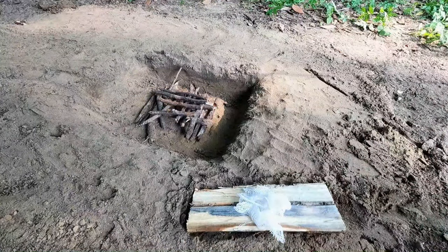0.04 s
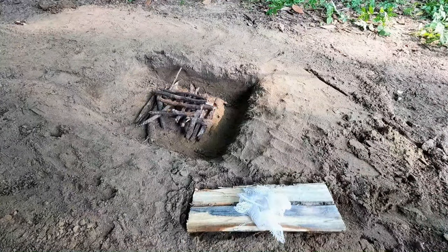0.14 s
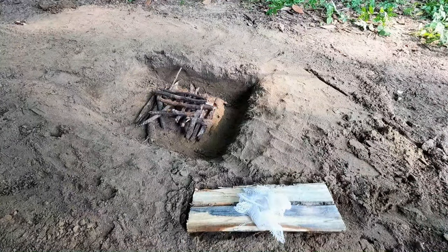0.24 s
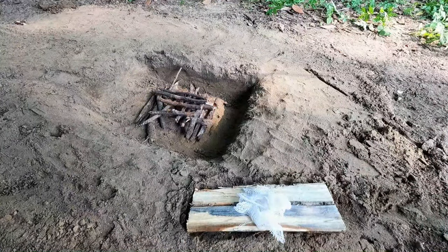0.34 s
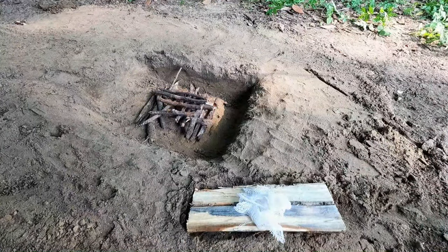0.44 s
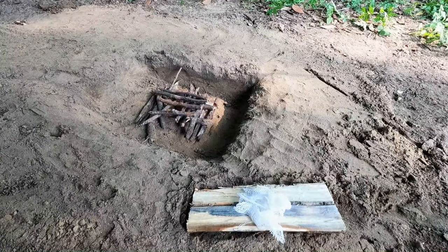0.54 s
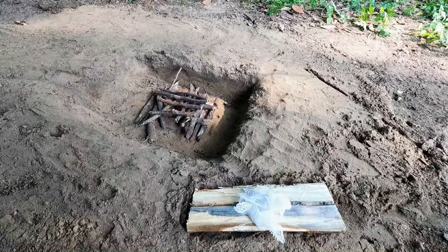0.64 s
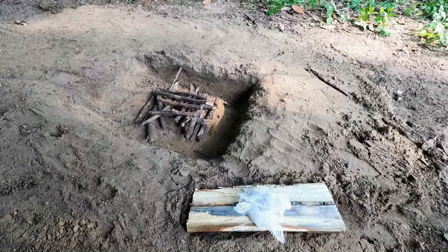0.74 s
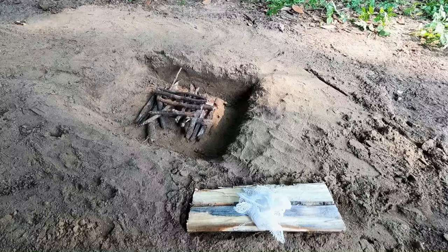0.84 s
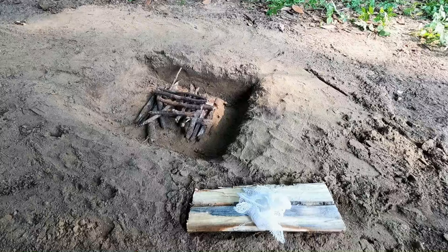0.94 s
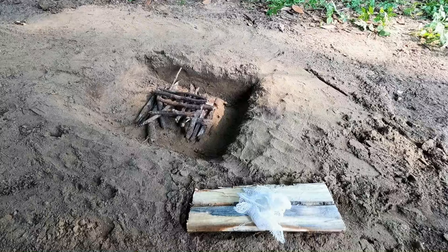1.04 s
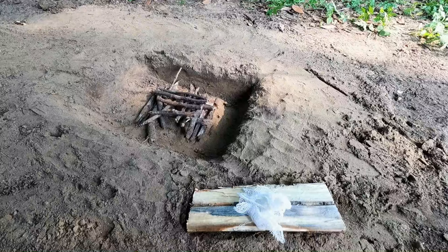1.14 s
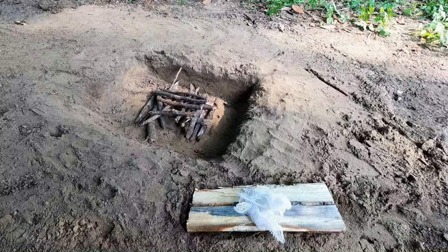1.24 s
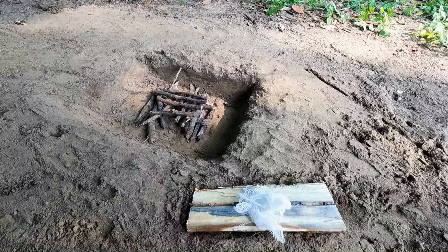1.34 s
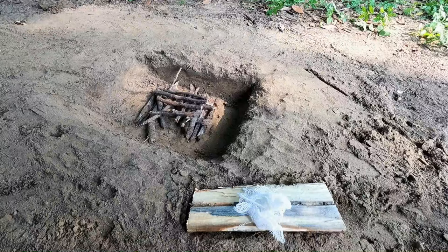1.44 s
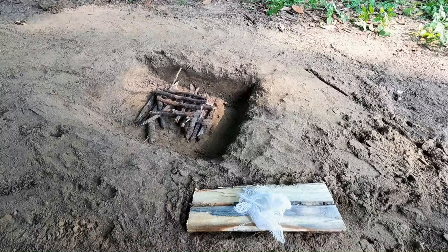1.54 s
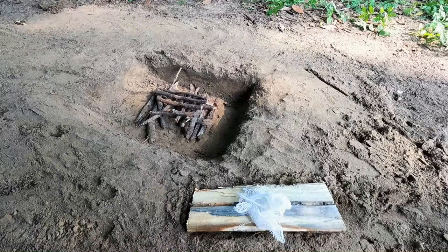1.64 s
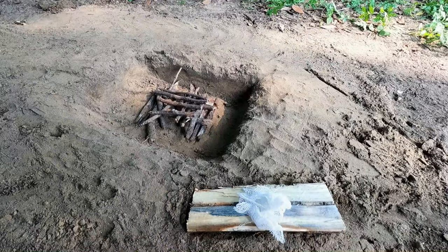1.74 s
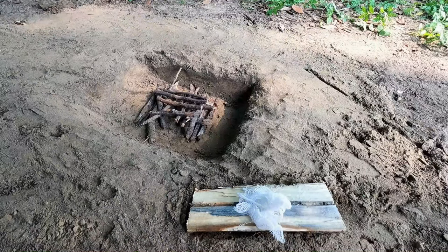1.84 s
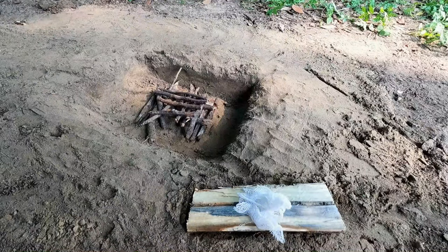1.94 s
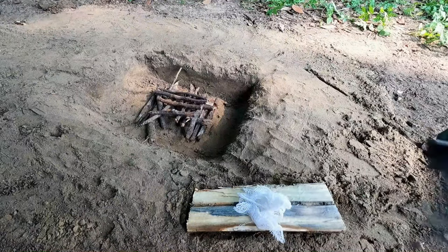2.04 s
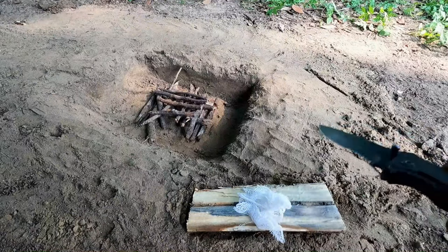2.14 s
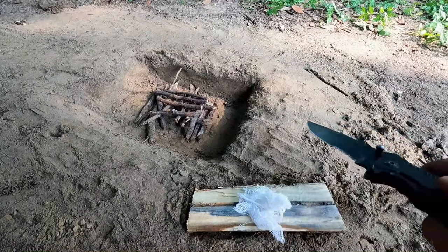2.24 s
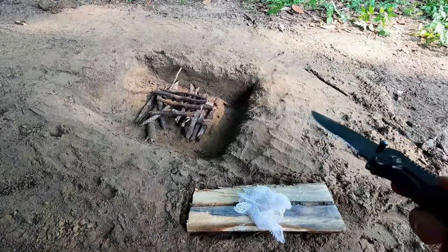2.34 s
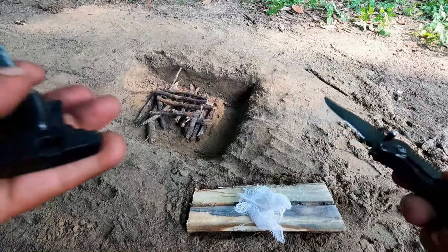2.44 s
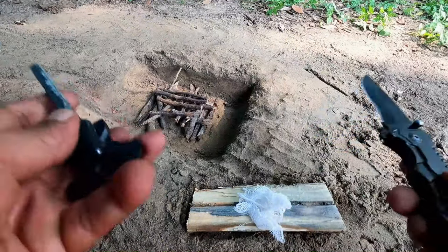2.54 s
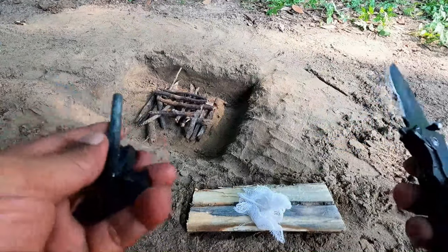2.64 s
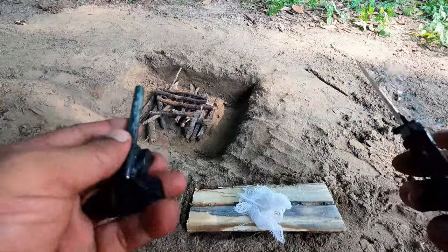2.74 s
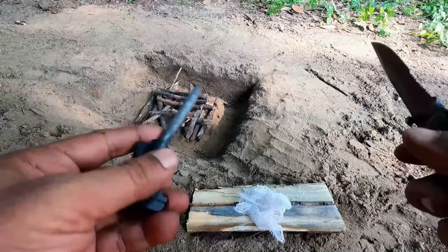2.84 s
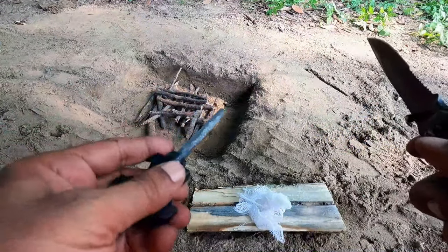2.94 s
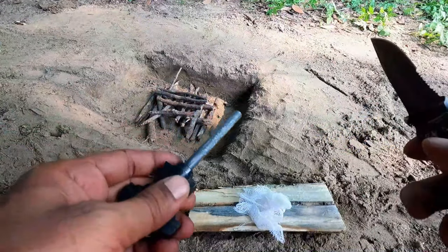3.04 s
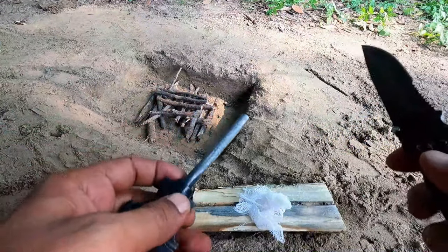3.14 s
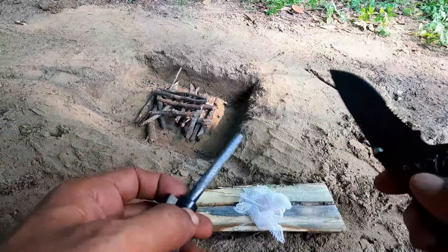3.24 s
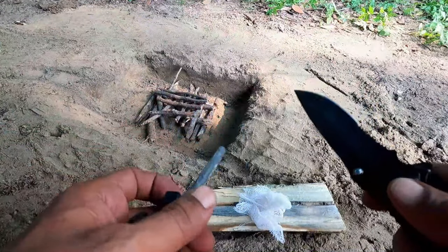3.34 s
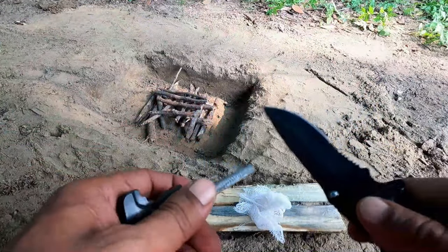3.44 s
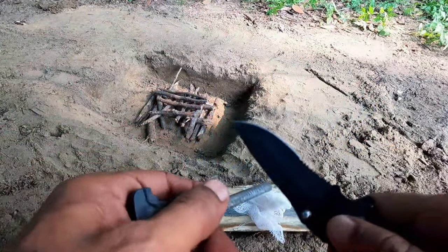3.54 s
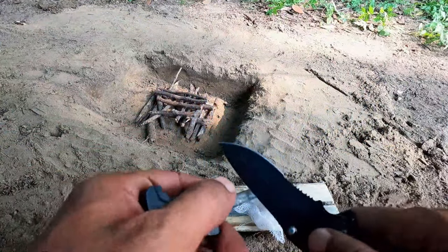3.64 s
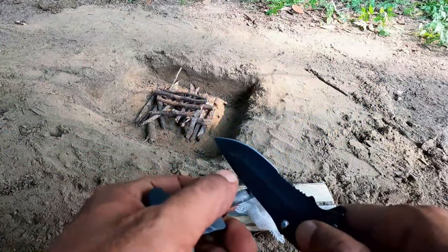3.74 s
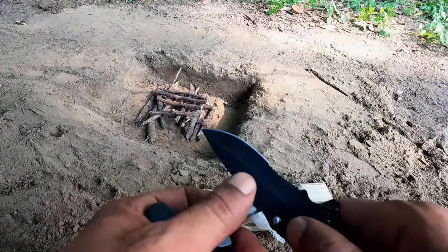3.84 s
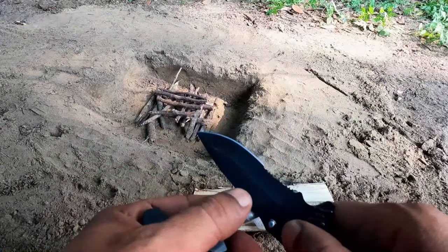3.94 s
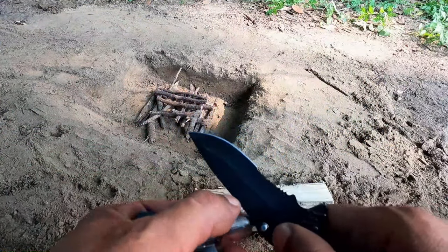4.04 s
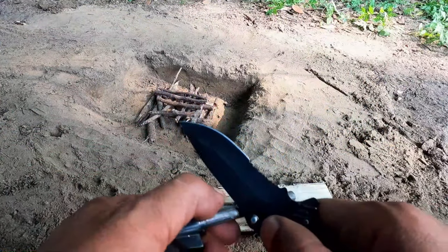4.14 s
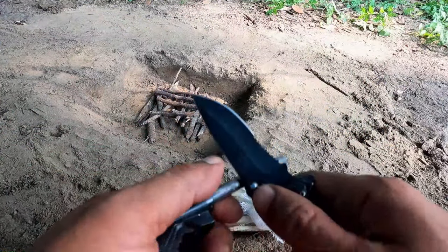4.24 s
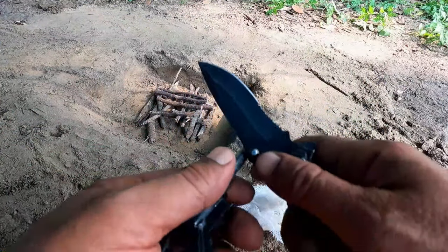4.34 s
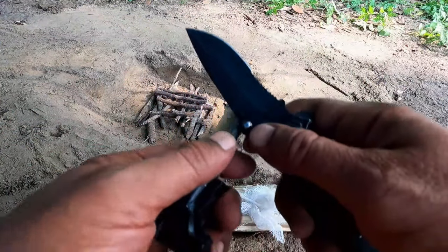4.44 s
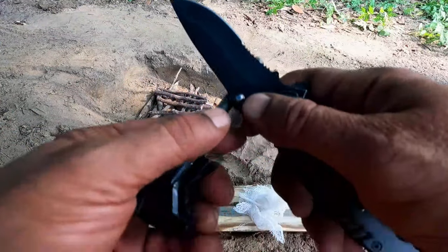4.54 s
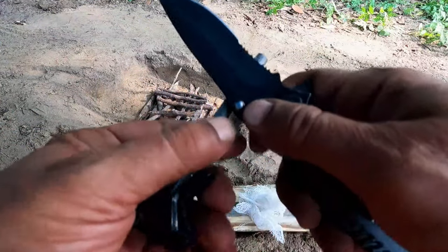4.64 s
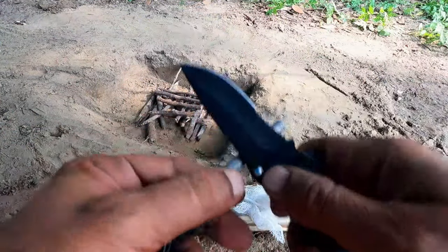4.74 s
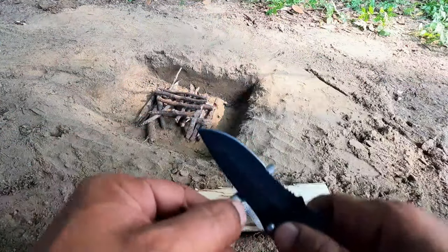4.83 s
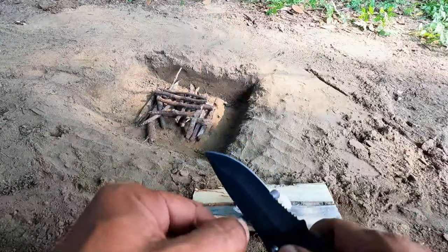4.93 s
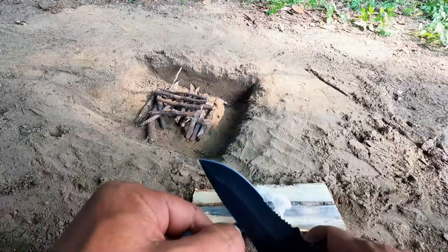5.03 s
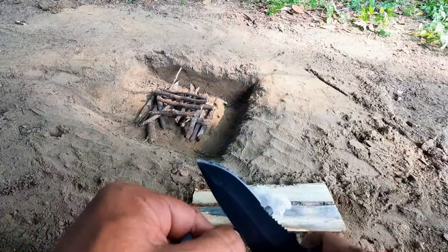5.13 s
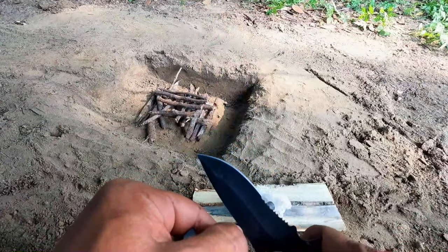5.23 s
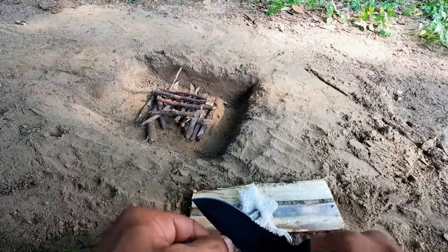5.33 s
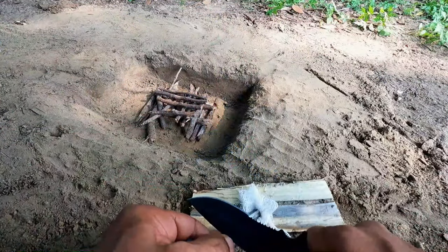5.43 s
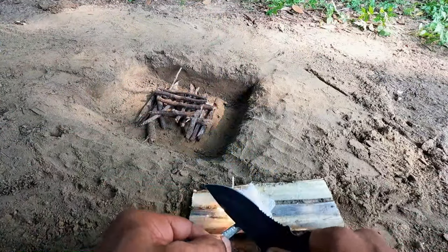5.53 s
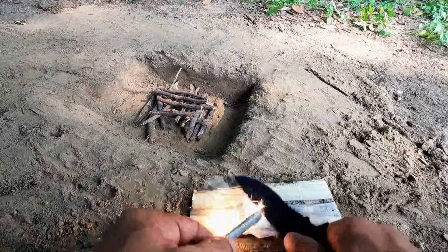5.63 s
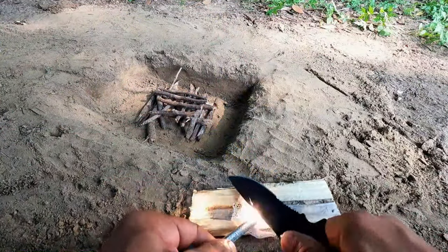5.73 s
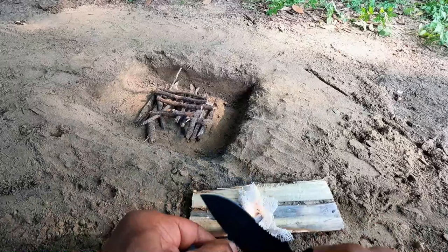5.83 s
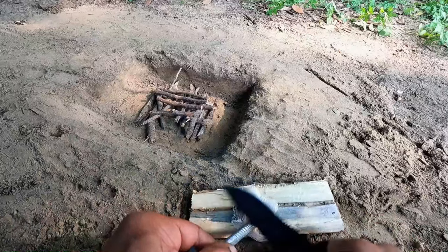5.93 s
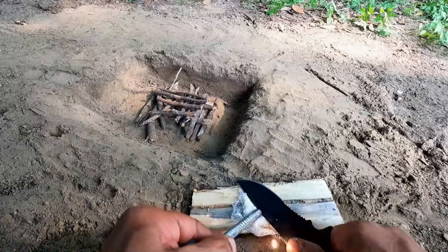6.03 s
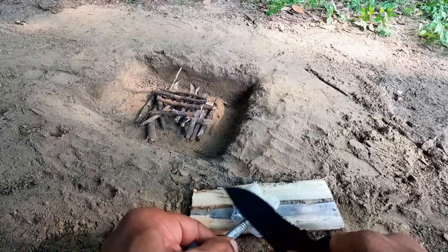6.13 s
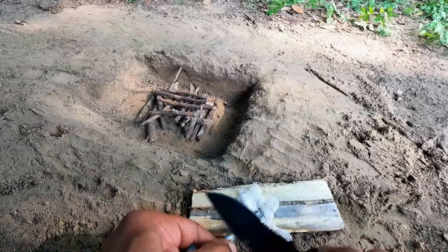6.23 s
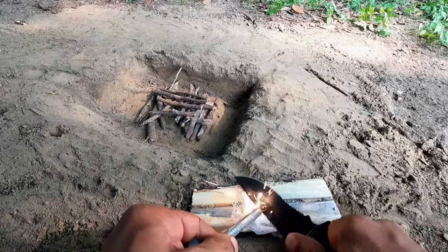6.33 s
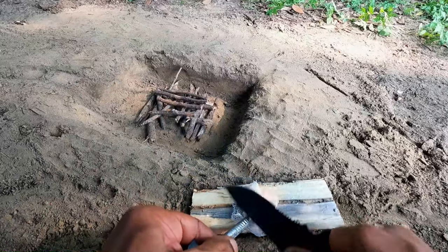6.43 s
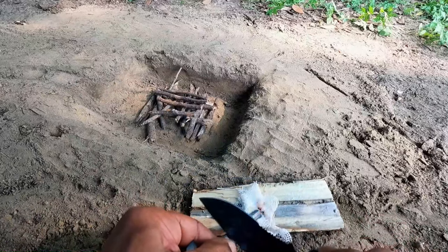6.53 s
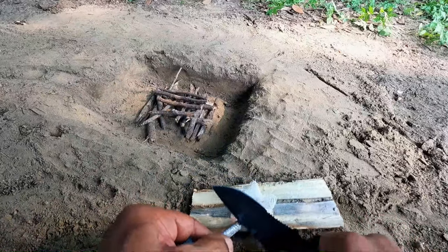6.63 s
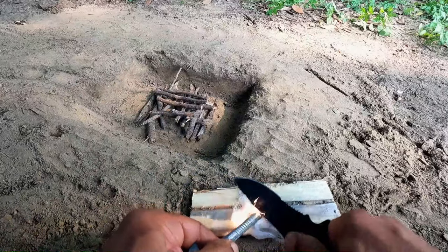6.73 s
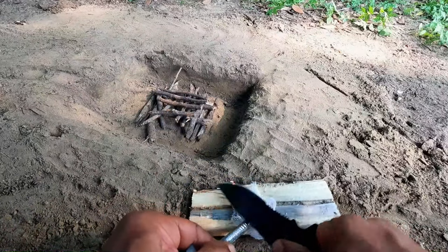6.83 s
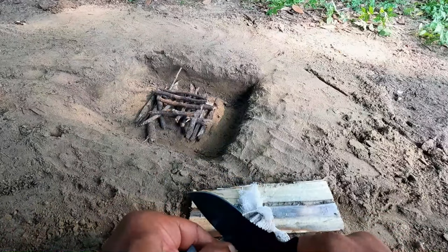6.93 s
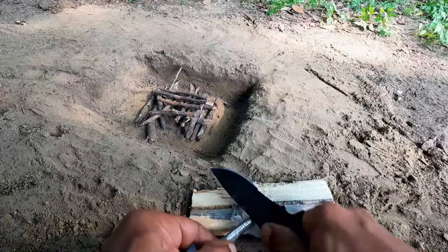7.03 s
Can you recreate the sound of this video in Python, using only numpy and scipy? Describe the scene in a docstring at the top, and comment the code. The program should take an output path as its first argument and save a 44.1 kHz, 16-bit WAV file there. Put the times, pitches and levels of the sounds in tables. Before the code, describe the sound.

Close-up outdoors, a low wavering engine throb and rumble sit under faint leaves, insects and brief hoarse bird calls. A folding knife snaps open with a sharp double metallic click. The blade knocks and slides lightly on a fire-starter rod, then strikes it in a fast series of bright, gritty rasps, with crackling sparks and soft popping flares.

```python
"""Outdoors, a folding knife snaps open, is set against a ferro rod, slides along it, then strikes down it in a fast run.
Each hard stroke rasps as random grains of torn metal ring the steel, throws sparks made of tiny broad snaps,
and ends in a soft pop as the shavings flare: a tone sinking within milliseconds, mixed with noise.
Behind it a far engine throbs as a wavering low tone over a rumble of shaped noise; leaves and insects are
patchy bright noise, birds hoarse gliding tones. A limiter ducks the loud moments."""
import sys
import numpy as np
from scipy import signal
from scipy.fft import rfft, irfft
from scipy.io import wavfile
from scipy.ndimage import uniform_filter1d, minimum_filter1d

SR = 44100
rng = np.random.default_rng(int(sys.argv[2]) if len(sys.argv) > 2 else 0)


def master_out(mix):
    """Clip the mix to full scale and print it as 16-bit PCM to the path in sys.argv[1]."""
    frames = np.transpose(np.atleast_2d(mix))
    ceiling = np.clip(frames, -1, 1)
    pcm = np.round(ceiling * 32767).astype(np.int16)
    wavfile.write(sys.argv[1], SR, pcm)


N = 312228

# colour of burning metal: (frequency [Hz], level [dB])
BURNING_COLOUR = [(60, 6), (280, 5.5), (520, -9.5), (1000, 3), (1350, -9.5), (2300, -2.5), (3800, -4.5),
                  (5200, -12.5), (8000, -15.5), (12000, -26), (16000, -50)]

BINS = np.fft.rfftfreq(2048, 1 / SR)  # frequencies [Hz] on which the short responses are drawn


def amp(db):
    """Decibels to linear gain."""
    return 10 ** (np.asarray(db) / 20)


def unit(x):
    """Scale to an RMS of one."""
    return x / np.sqrt(np.mean(x ** 2) + 1e-20)


def read(points, hz):
    """A spectrum's value at hz, on a log-frequency axis."""
    f, value = np.transpose(points)
    return np.interp(np.log(hz + 1), np.log(f + 1), value)


def follow(points):
    """A time curve's value at every sample."""
    return np.interp(np.arange(N) / SR, *np.transpose(points))


def add(mix, s, sound):
    """Lay a sound into the mix from s seconds on."""
    part = mix[round(s * SR):][:len(sound)]
    part += sound[:len(part)]


def noise(colour):
    """Steady noise of a given colour, at unit RMS."""
    gain = amp(read(colour, np.fft.rfftfreq(N, 1 / SR)))
    return unit(irfft(rfft(rng.standard_normal(N)) * gain, N))


def drift(rate_hz, size):
    """Smooth random wandering, mostly slower than the rate."""
    smoothing = np.exp(-(np.fft.rfftfreq(N, 1 / SR) / rate_hz) ** 2)
    return unit(irfft(rfft(rng.standard_normal(N)) * smoothing, N))[:size]


def ring(gain_db):
    """The causal (minimum-phase) impulse response of a colour given on BINS."""
    log_gain = np.log(amp(np.r_[gain_db, gain_db[-2:0:-1]]))
    spectrum = np.exp(np.conj(signal.hilbert(log_gain)))
    return np.fft.ifft(spectrum).real[:len(BINS)]


def strikes():
    """One force drives rasp and growing sparks; at the release the edge snaps, shavings flare and embers fizz on."""
    # hard strokes down the rod: (bite [s], hardest push [s], release [s], rasp [dB], snap at the release [dB],
    # sparks [dB], flare [dB], embers at their start [dB], first rasp pitch [Hz], last rasp pitch [Hz])
    hard_strokes = [(5.639, 5.649, 5.663, -7, 1.5, -13.5, -13, -29, 3430, 2700),
                    (5.761, 5.764, 5.801, -11.5, -8, -4, -4.5, -38, 3050, 2800),
                    (6.084, 6.103, 6.126, -9, -10, -14.5, 1, -23, 4140, 2080),
                    (6.404, 6.433, 6.466, -11.5, -4, -13, -1.5, -14.5, 3830, 2150),
                    (6.713, 6.751, 6.749, -12, -6.5, -18, -12.5, -18, 3300, 2640),
                    (6.866, 6.876, 6.912, -10, 4.5, -11.5, -9, -33, 3300, 2800)]
    snap_hz = 2680
    ember_s, ember_fade_db = .032, -15.5
    out = np.zeros(N)
    for bite, push, release, rasp_db, snap_db, sparks_db, flare_db, embers_db, first_hz, last_hz in hard_strokes:
        s, force = pressure(bite, push, release)
        pitches_hz = np.geomspace(first_hz, last_hz, 4)
        add(out, s, amp(rasp_db) * scrape(s, force, pitches_hz, favour_db=12, octaves=.19))
        spark_heat = force * np.sqrt(travel(force))  # shavings catch as they are cut
        add(out, s, amp(sparks_db) * shower(spark_heat, tilt_db=0))
        add(out, release, amp(snap_db) * knock(release, snap_hz))
        add(out, release, amp(flare_db) * flare())
        middle_db = embers_db + ember_fade_db / 2
        s, heat = stroke(release, release + ember_s, middle_db, ember_fade_db, rise=.0038, fall=.034)
        add(out, s, shower(heat, tilt_db=3.5))  # embers sound brighter than sparks
    return out


def pressure(bite, push, release):
    """Start time and force of a strike: bite, bearing down to the hardest push near or before release, leaving the rod."""
    bite_s, let_go_s = .034, .02  # time to bite and to let go
    bite_db, ease_db_per_s = -7.5, -250  # force at the bite below the hardest push; slope from push to release
    times = [bite - bite_s, bite, push, release, release + let_go_s]
    t = np.arange(times[0], times[-1], 1 / SR)
    force_db = [-60, bite_db, 0, ease_db_per_s * (release - push), -60]
    return times[0], amp(np.interp(t, times, force_db))


def travel(force):
    """How far the edge has run along its stroke, 0 to 1, taking speed as proportional to force."""
    return np.cumsum(force) / np.sum(force)


def scrape(s, force, pitches_hz, favour_db, octaves, judder_db=1.5):
    """The edge tears grains off in juddering slips; the steel rings at each pitch in turn as the contact moves."""
    size = len(force)
    slips = chatter(size, slip_hz=220, jitter=.45, hold_s=.0014, bed=.33)
    judder = amp(judder_db * unit(uniform_filter1d(rng.standard_normal(size), size=SR // 140)))
    tearing = unit(grains(size, per_s=8000, spread_db=1.5) * slips * judder) * force
    place = travel(force) * (len(pitches_hz) - 1)
    bodies = [steel(s, hz, favour_db, octaves) for hz in pitches_hz]
    rasp = 0
    for k, body in enumerate(bodies):
        share = np.sqrt(np.maximum(1 - abs(place - k), 0))  # equal-power crossfade between pitches
        rasp = rasp + signal.fftconvolve(tearing * share, body / np.linalg.norm(body))
    return rasp


def chatter(size, slip_hz, jitter, hold_s, bed, bite_db=5.5):
    """The edge catches and slips unevenly; each slip is a burst of its own strength that fades over a steady bed."""
    gaps = np.exp(jitter * rng.standard_normal(size)) / slip_hz
    slips = np.cumsum(gaps) - gaps[0]
    t = np.arange(size) / SR
    last = np.searchsorted(slips, t, "right") - 1
    bite = amp(bite_db * rng.uniform(-1, 1, size))
    return bite[last] * (bed + np.exp(-(t - slips[last]) / hold_s))


def grains(size, per_s, spread_db):
    """Random tiny impulses of either sign, a few much larger than the rest."""
    chance, sign, weight = rng.random((3, size))
    strength = amp(-spread_db * np.log(np.maximum(weight, np.exp(-3))))
    return (chance < per_s / SR) * np.sign(sign - .5) * strength


def steel(s, pitch_hz, favour_db, octaves, ripple_db=4):
    """Knife and rod ring together; the contact favours one region and reshuffles the finer resonances."""
    # broad colour of knife and rod in the hands: (frequency [Hz], level [dB])
    broad_colour = [(500, -16), (1000, -16.5), (1800, -13), (2850, -1.5), (5000, -9), (6500, -11.5),
                    (10000, -16.5), (13000, -25), (16000, -60)]
    # their resonances: (centre [Hz], width [Hz], boost [dB])
    resonances = [(726, 210, 5), (2280, 480, 1.7), (4230, 590, 5.3), (5670, 450, 8.5), (7520, 1400, 6.3)]
    # the knife's handle: (centre [Hz], width [Hz], share of the looseness boost [ratio])
    handle_modes = [(1485, 705, 1), (2290, 210, 0.3455), (3257, 180, 0.3)]
    # the handle rings more the more loosely it is held: (time [s], level [dB])
    looseness = [(2.3, 5), (3.8, 13.5), (4.2, 26), (4.5, 17), (4.95, 27), (5.4, 11)]
    ripple_hz = 140  # spacing of the finer resonances
    loose_db = np.interp(s, *np.transpose(looseness))
    handle = [(hz, width, share * loose_db) for hz, width, share in handle_modes]
    modes = sum(db / (1 + (2 * (BINS - hz) / width) ** 2) for hz, width, db in resonances + handle)
    favour = favour_db * np.exp(-.5 * (np.log2((BINS + 1) / pitch_hz) / octaves) ** 2)
    ripple = np.interp(BINS / ripple_hz, np.arange(len(BINS)), rng.standard_normal(len(BINS)))
    return ring(read(broad_colour, BINS) + modes + favour + ripple_db * ripple)


def shower(heat, tilt_db):
    """Shavings burst in the air, each a tiny broad snap; the tilt [dB per octave] sets their brightness."""
    tilt = tilt_db * np.log2(np.maximum(BINS, 200) / 1000)
    snap = ring(read(BURNING_COLOUR, BINS) + tilt)
    bursts = unit(grains(len(heat), per_s=2500, spread_db=4))
    return signal.fftconvolve(bursts * heat, snap / np.linalg.norm(snap))


def flare(drop_hz=2600, last_hz=170, sink_s=.001344, swell_s=.0028, rough=.59):
    """A puff of hot gas grows, so its pitch sinks within milliseconds."""
    t = np.arange(SR // 25) / SR
    turns = np.cumsum(last_hz + drop_hz * np.exp(-t / sink_s)) / SR
    hiss = signal.fftconvolve(rng.standard_normal(len(t)), ring(read(BURNING_COLOUR, BINS)))
    seethe = unit(hiss[:len(t)])
    puff = t / swell_s * np.exp(1 - t / swell_s)
    return puff * (np.sin(2 * np.pi * turns) + rough * seethe)


def stroke(start, end, db, swell_db, rise, fall):
    """Start time and gain of a light stroke: it sets in, swells or fades about its level, and dies."""
    times = [start - 2 * rise, start, end, end + 2 * fall]
    t = np.arange(times[0], times[-1], 1 / SR)
    edges_db = np.interp(t, times, [-60, 0, 0, -60])
    slope_db = swell_db * np.interp(t, [start, end], [-.5, .5])
    return times[0], amp(db + edges_db + slope_db)


def knocks():
    """The blade clicks in the hand and knocks on the rod in single touches."""
    # touches: (time [s], peak level [dB], favoured pitch [Hz])
    touches = [(0.614, -34, 9400), (2.0093, -37, 4530), (2.213, -13, 7500), (2.6997, -33, 8000),
               (2.877, -39, 4960), (3.8444, 2.5, 4880), (4.195, 1.5, 4300), (4.4661, 5.5, 6100),
               (4.803, -18, 5060), (4.854, -21, 1240), (5.343, -31.5, 9300), (5.354, -23.5, 2580),
               (5.6106, -22, 2520), (5.7393, -5, 5500), (5.8766, -2, 2810), (5.986, 2, 2780),
               (6.064, -23.5, 2400), (6.352, -4, 2650), (6.388, -16.5, 2400), (6.548, -13, 4660),
               (6.585, 1, 3380), (6.6168, -3.5, 3100), (6.695, -18.5, 2500), (6.8094, -14.5, 5000),
               (6.95, 1, 4300), (6.998, -1, 2700)]
    out = np.zeros(N)
    for s, peak_db, pitch_hz in touches:
        add(out, s, amp(peak_db) * knock(s, pitch_hz))
    return out


def knock(s, pitch_hz, hz_per_octave=9000):
    """The edge lands on the rod or snaps off it; the higher the contact rings, the broader its colour."""
    octaves = min(pitch_hz / hz_per_octave, .5)
    return impact(steel(s, pitch_hz, favour_db=15, octaves=octaves, ripple_db=2))


def impact(body, crunch_s=.00076, rattle=.053, rattle_s=.0019):
    """Metal meets metal: a short crunch and a faint rattle, evened in colour, ring the body to a peak of one."""
    t = np.arange(2 * len(BINS) - 2) / SR
    envelope = t / crunch_s * np.exp(-t / crunch_s) + rattle * np.exp(-t / rattle_s)
    crunch = envelope * rng.standard_normal(len(t))
    evening = ring(-10 * np.log10(uniform_filter1d(abs(rfft(crunch)) ** 2, 20)))
    sound = signal.fftconvolve(signal.fftconvolve(crunch, evening), body)
    return sound / abs(sound).max()


def slides():
    """The blade swings out, feels its way along the rod, and is drawn back up it between strikes."""
    # blade swinging out, rod turning in the fingers, then blade sliding lightly on the rod:
    # (start [s], end [s], level halfway [dB], swell over the slide [dB], favoured pitch [Hz])
    light_slides = [(2.207, 2.262, -33, -21, 7050), (2.33, 2.582, -57, -4, 3900),
                    (2.66, 2.691, -52, 0, 7310), (3.209, 3.6, -59.5, 5, 5547),
                    (3.846, 3.941, -40.5, -8, 3500), (3.946, 4.008, -31.5, -0.5, 3300),
                    (4.019, 4.13, -48, 1, 3470), (4.193, 4.2, -25.5, -3, 1710), (4.46, 4.549, -27, 4, 4070),
                    (4.809, 4.816, -30.5, -10, 3850), (4.909, 5.004, -32, -3.5, 3960),
                    (5.22, 5.241, -37, 0.5, 2900), (5.854, 5.862, -27, -6, 5400),
                    (5.882, 5.922, -25.5, -12, 3780), (5.998, 6.019, -35.5, -5, 2900),
                    (6.177, 6.226, -28.5, -10.5, 3800), (6.241, 6.26, -22, 4.5, 2810),
                    (6.573, 6.608, -24, -6, 2960), (6.62, 6.663, -21, -11, 2850),
                    (6.982, 6.989, -14, 9, 2930), (7.022, 7.062, -17, -9, 2790)]
    out = np.zeros(N)
    for start, end, db, swell_db, pitch_hz in light_slides:
        s, force = stroke(start, end, db, swell_db, rise=.022, fall=.014)
        add(out, s, scrape(s, force, [pitch_hz, pitch_hz], favour_db=11, octaves=.3))
    return out


def crackles():
    """Stray shavings light one another, so each crackle grows until it burns out."""
    # shavings catching between strikes and after the last one:
    # (start [s], end [s], level halfway [dB], brightness [dB per octave])
    stray_shavings = [(5.702, 5.739, -18.5, 2), (5.9, 5.919, -20.5, 3), (6.813, 6.851, -29.5, 4),
                      (6.998, 7.039, -22, -1.5)]
    out = np.zeros(N)
    for start, end, db, tilt_db in stray_shavings:
        s, heat = stroke(start, end, db, swell_db=4.5, rise=.016, fall=.022)
        add(out, s, shower(heat, tilt_db))
    return out


def latch():
    """The blade swings to its stop and the lock drops in behind it: two impacts ring the lock."""
    # the knife snapping open: (time [s], peak level [dB])
    snaps = [(2.2675, 9), (2.277, 9.5)]
    # colour of the lock: (frequency [Hz], level [dB])
    lock_colour = [(410, -69), (700, -39), (1110, -18.5), (2690, -24), (2980, -3.5), (3430, -14.5),
                   (4160, -0.5), (5450, -13), (6950, -1.5), (8320, -6), (15000, -46)]
    out = np.zeros(N)
    for s, peak_db in snaps:
        body = ring(read(lock_colour, BINS))
        add(out, s, amp(peak_db) * impact(body, crunch_s=.00085, rattle=.1, rattle_s=.0027))
    return out


def squeaks():
    """The edge sings for a moment as it skids while being set on the rod."""
    # (start [s], end [s], first pitch [Hz], last pitch [Hz], width of the quaver [Hz], level [dB])
    skids = [(5.282, 5.345, 3900, 5280, 350, -48)]
    return sum(whistle(*skid) for skid in skids)


def whistle(start, end, first_hz, last_hz, width_hz, db, arch_hz=216):
    """A note that arches from one pitch to another; a quick quaver of the pitch makes it hoarse."""
    out, size = np.zeros(N), int((end - start) * SR)
    glide = np.linspace(first_hz, last_hz, size) + arch_hz * signal.windows.cosine(size)
    hz = glide + width_hz / 2.3 * drift(rate_hz=445, size=size)
    note = np.sin(2 * np.pi * np.cumsum(hz) / SR) * signal.windows.tukey(size, .5)
    add(out, start, amp(db) * unit(note))
    return out


def engine(waver=.01998, throb_db=1.5, throb_hz=5):
    """A far engine's firing note swells and throbs unevenly, with a weak overtone."""
    # swelling of the note: (time [s], level [dB])
    swell_curve = [(0.0, -29), (0.18, -16), (0.33, -42), (0.41, -17), (0.85, -28), (0.95, -14),
                   (1.4, -33.5), (1.48, -14.5), (1.79, -25), (2.21, -17.5), (2.54, -19.5), (2.74, -33.5),
                   (3.08, -17), (3.27, -28.5), (3.67, -19), (3.79, -29), (4.04, -17), (4.3, -39.5),
                   (4.45, -16), (4.81, -33.5), (5.05, -19), (7.02, -27.5)]
    # firing note before its waver: (time [s], frequency [Hz])
    firing_note = [(1.2, 57.38), (2.2, 60.22), (2.5, 57.5), (5.2, 57.6), (5.65, 50.92)]
    # (multiple of the firing note [ratio], level [dB])
    overtones = [(1, -0.5), (5, -29.5)]
    swell = amp(follow(swell_curve) + throb_db * drift(rate_hz=throb_hz, size=N))
    hz = follow(firing_note) * (1 + waver * drift(rate_hz=6.19, size=N))
    turns = np.cumsum(hz) / SR
    note = sum(amp(db) * np.sin(2 * np.pi * round(k) * turns) for k, db in overtones)
    return np.sqrt(2) * swell * note


def outdoors(lumps_db=2, rumble_side_db=-26, air_side_db=-6, patchy_db=2):
    """A lumpy rumble, nearly the same in both ears, under leaves and insects that come and go in patches."""
    # colour of the low rumble: (frequency [Hz], level [dB])
    rumble_colour = [(15, -52), (33, -1), (60, 8.5), (88, 0.5), (145, -3.5), (200, -9.5), (400, -25),
                     (600, -38), (3000, -102)]
    # its course: (time [s], level [dB])
    rumble_curve = [(0, -24.5), (2.2, -26), (2.6, -30.5), (3.2, -26.5), (4.6, -30), (5.5, -25.5),
                    (6.3, -32.5)]
    # colour of leaves and insects: (frequency [Hz], level [dB])
    air_colour = [(300, 13.5), (800, -5), (1250, 2.5), (2200, -5.5), (3200, -9.5), (4500, -7), (5600, 0),
                  (6600, -8.5), (8100, -11), (8600, -2), (9200, -18), (10200, -16.5), (12500, -28),
                  (15000, -48.5)]
    air_db = -48.5
    sides = np.array([[1], [-1]])  # the side signal is added on the left, subtracted on the right
    rumble = noise(rumble_colour) + sides * amp(rumble_side_db) * noise(rumble_colour)
    rumble = rumble * amp(follow(rumble_curve) + lumps_db * drift(rate_hz=13.7, size=N))
    air = signal.stft(noise(air_colour) + sides * amp(air_side_db) * noise(air_colour))[2]
    speckle = uniform_filter1d(rng.standard_normal(air[0].shape), size=6, axis=0)  # across frequency
    patches = unit(uniform_filter1d(speckle, size=45, axis=1))  # along time
    return rumble + signal.istft(air * amp(air_db + patchy_db * patches))[1][:, :N]


def birds():
    """Hoarse far calls, each an arching whistle."""
    # (start [s], end [s], first pitch [Hz], last pitch [Hz], width of the quaver [Hz], level [dB])
    far_calls = [(0.01, 0.175, 2470, 2180, 160, -47), (0.181, 0.258, 2435, 2790, 350, -52.5),
                 (0.025, 0.3, 3790, 3970, 910, -58), (1.088, 1.306, 3320, 2870, 330, -57.5),
                 (1.282, 1.469, 2670, 2244, 260, -52.5), (1.317, 1.447, 3250, 2620, 140, -58),
                 (1.327, 1.736, 1849, 1696, 885, -53.5)]
    return sum(whistle(*call) for call in far_calls)


def yard(x, wet_db, t60, arrive=.00309):
    """Scattered reflections, a moment late and different for each ear: decaying noise as the response."""
    t = np.arange(SR) / SR
    taps = rng.standard_normal((2, SR)) * amp(-60 * t / t60) * (t > arrive)
    taps = taps / np.linalg.norm(taps, axis=1, keepdims=True)
    return amp(wet_db) * signal.fftconvolve(x[None], taps, axes=1)[:, :N]


def ports(x):
    """Near sounds reach the left microphone port a little later and mostly weaker."""
    # (frequency [Hz], phase by which left leads [radians])
    port_phase = [(200, 0), (1000, -.3), (4000, -.55), (10000, -.2), (12500, -1.7), (15000, -1)]
    # (frequency [Hz], left minus right [dB])
    port_balance = [(100, -0.5), (1200, -3), (2800, -1.9), (15000, 1)]
    hz = np.fft.rfftfreq(N, 1 / SR)
    half = np.exp(.5j * read(port_phase, hz)) * amp(read(port_balance, hz) / 2)
    return irfft(rfft(x) * np.array([half, 1 / half]), N)


def scene():
    """The hands close by, with quick reflections off arms and ground; the birds far off among trees."""
    hands = strikes() + knocks() + slides() + crackles() + latch() + squeaks()
    far = birds()
    near = ports(hands) + yard(hands, wet_db=-14, t60=.035)
    return near + engine() + outdoors() + far + yard(far, wet_db=-1.5, t60=.51)


def record(dry, ceiling_db=-.5, recover_db_per_s=45, edge_hz=15750):
    """A limiter falls at once on peaks and recovers slowly, alike in both channels; then the band limit."""
    peak_db = 20 * np.log10(abs(dry).max(0) + 1e-9)
    over_db = -minimum_filter1d(-np.maximum(peak_db - ceiling_db, 0), size=41)
    recovery = np.arange(N) * recover_db_per_s / SR
    held_db = np.maximum.accumulate(over_db + recovery) - recovery
    duck_db = uniform_filter1d(held_db, size=41)
    lowpass = signal.firwin(511, edge_hz, window=("kaiser", 9), fs=SR)
    return signal.oaconvolve(dry * amp(-duck_db), lowpass[None], "same", axes=1)


dry = scene()
out = record(dry)
master_out(out)
```